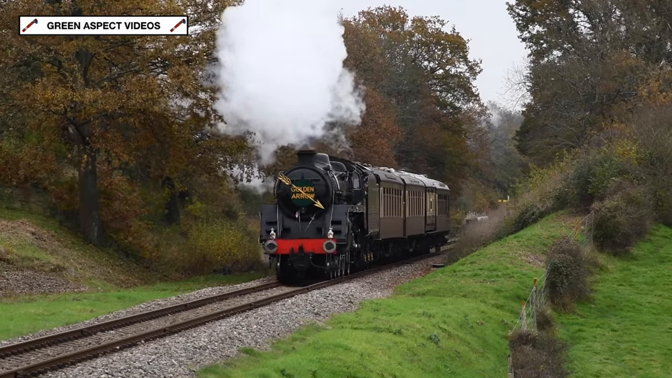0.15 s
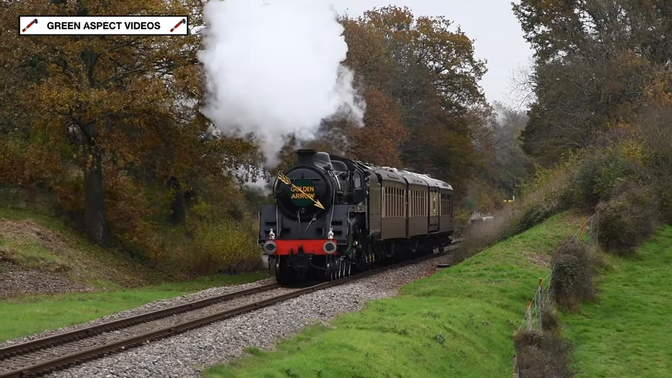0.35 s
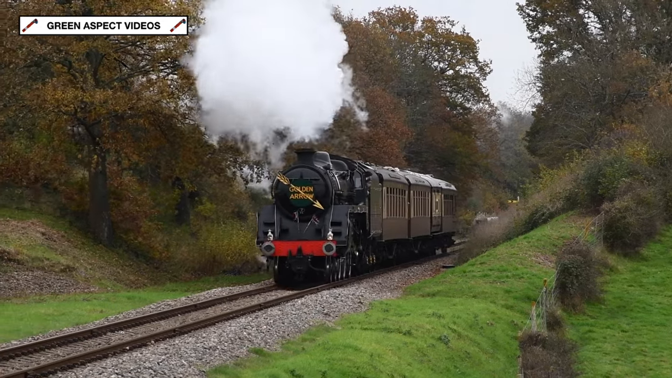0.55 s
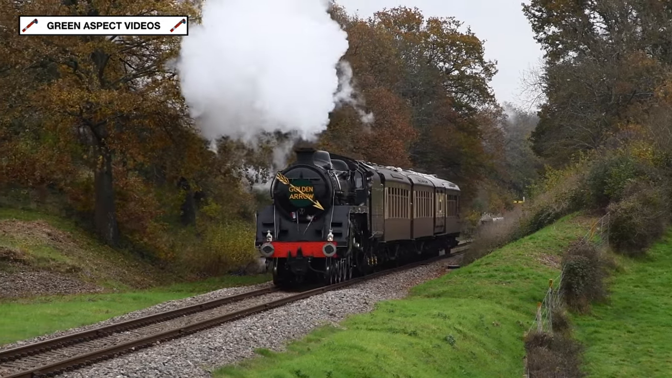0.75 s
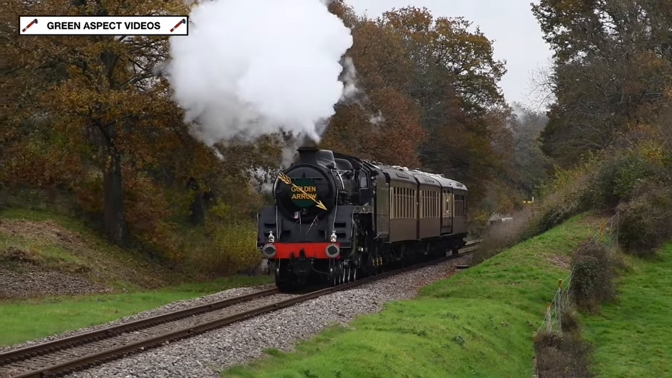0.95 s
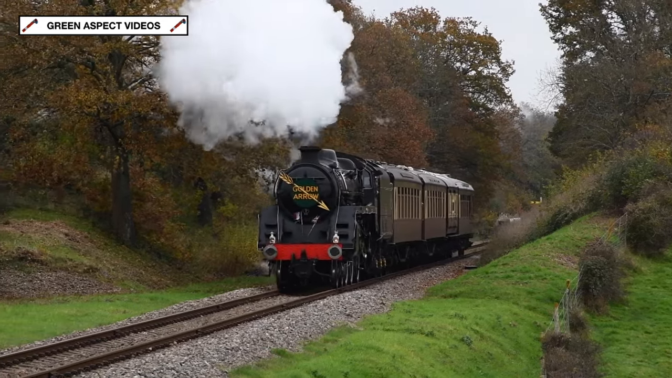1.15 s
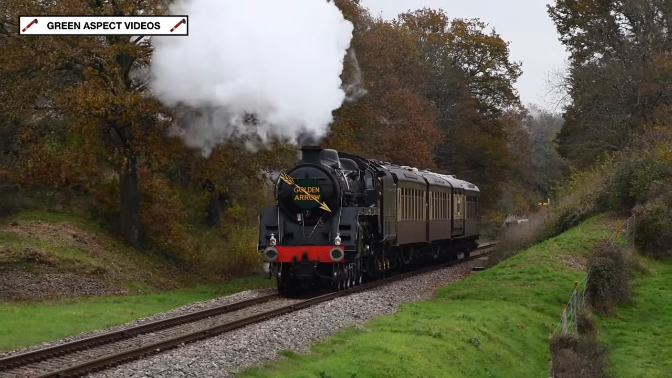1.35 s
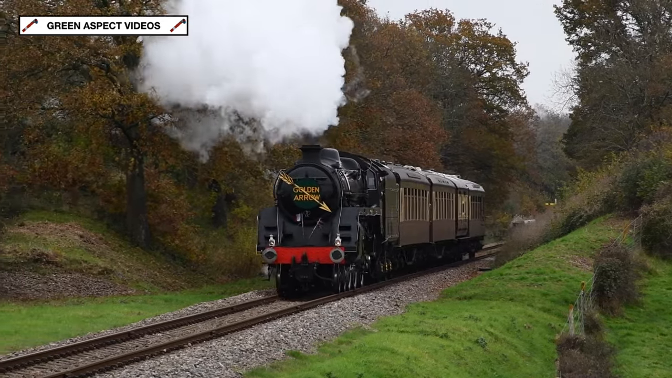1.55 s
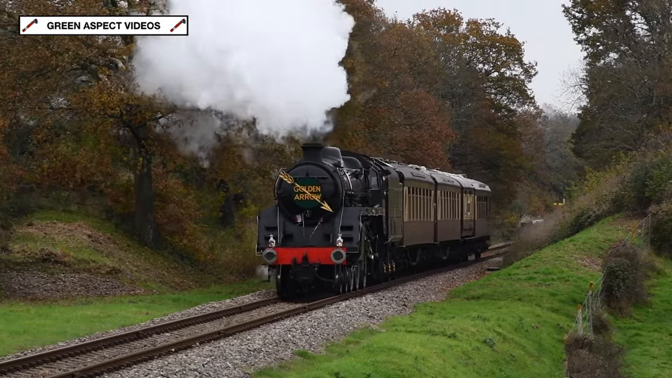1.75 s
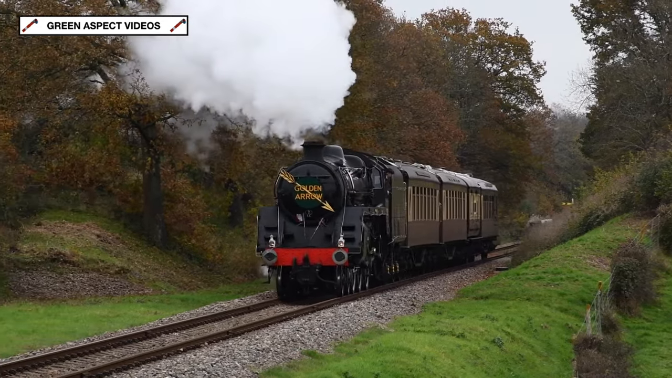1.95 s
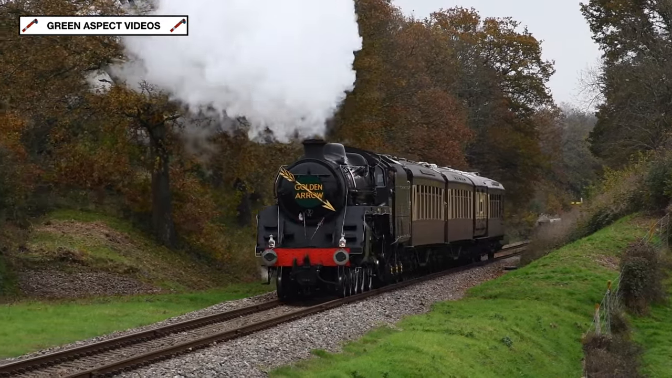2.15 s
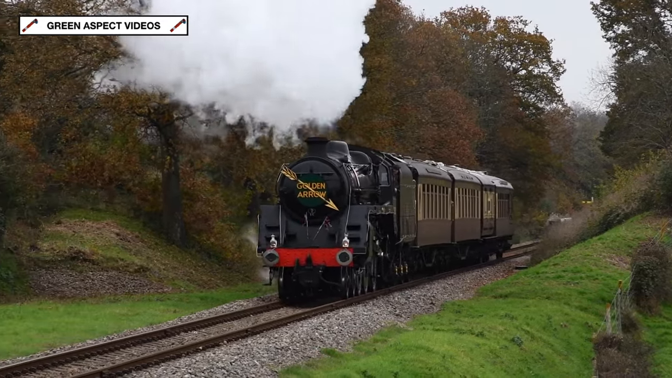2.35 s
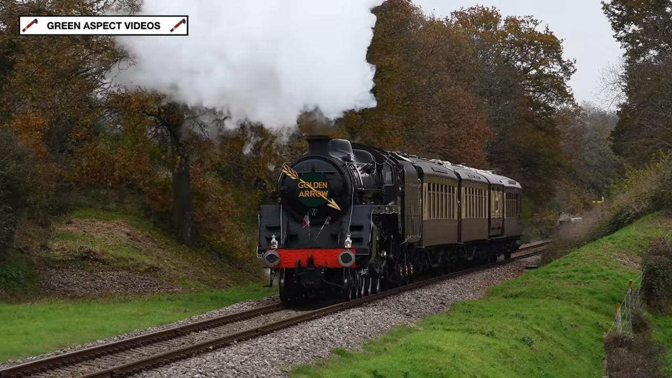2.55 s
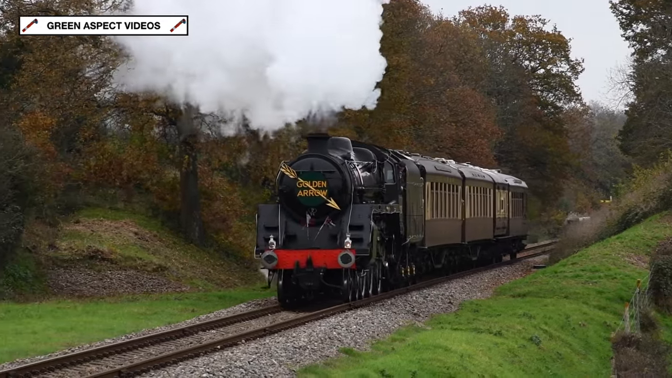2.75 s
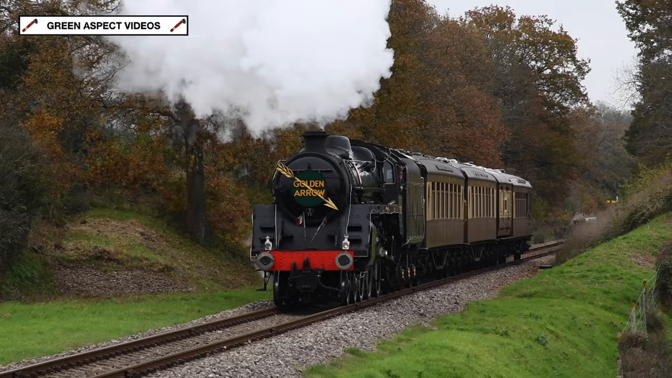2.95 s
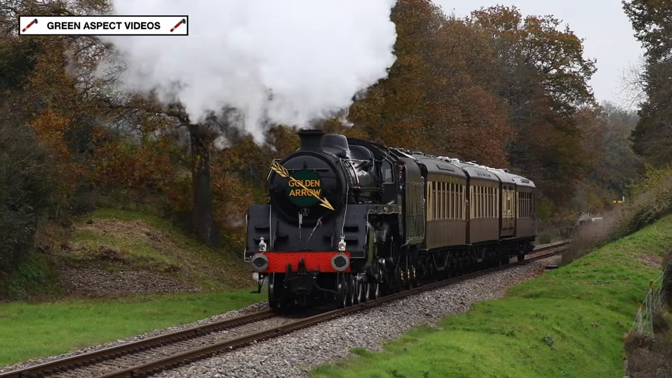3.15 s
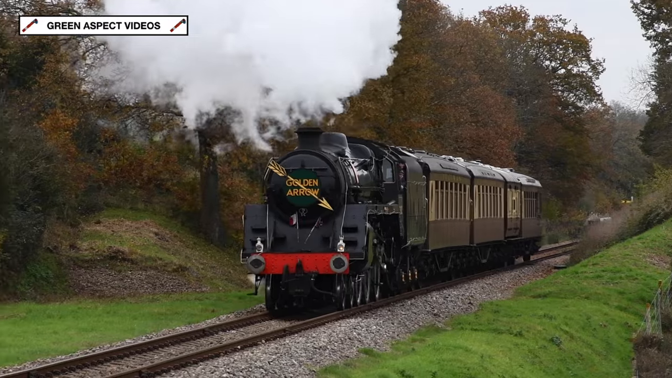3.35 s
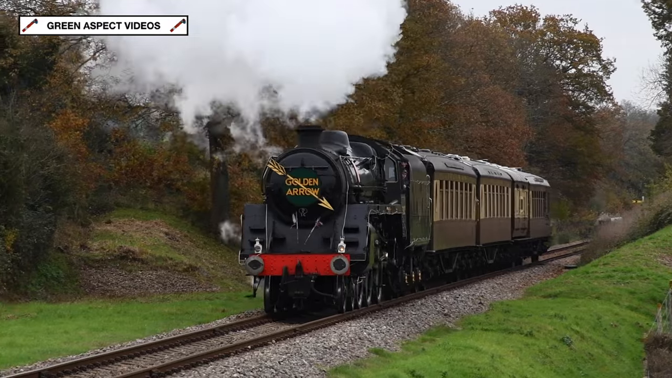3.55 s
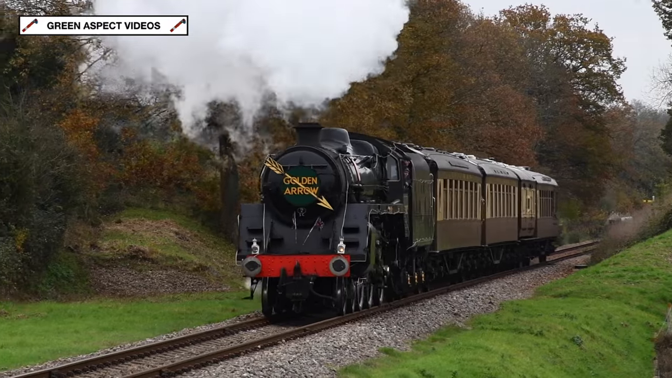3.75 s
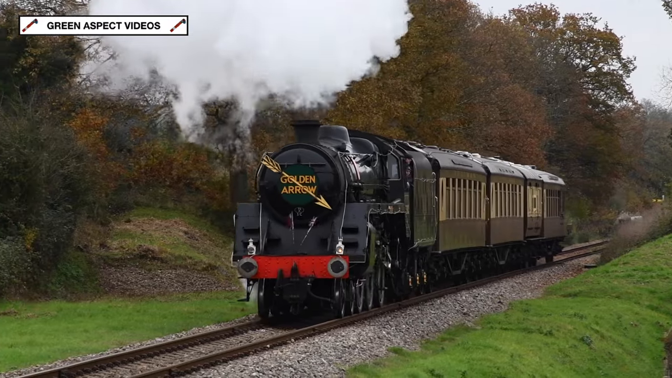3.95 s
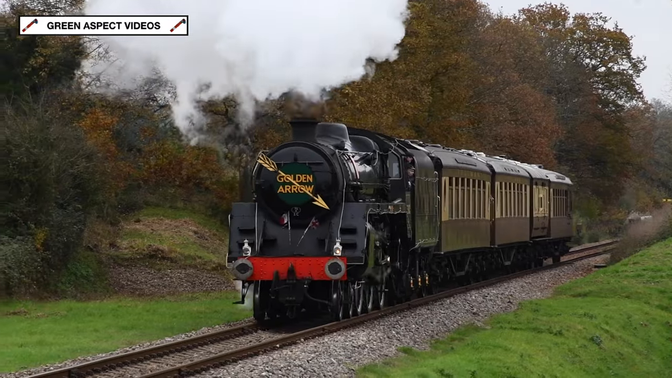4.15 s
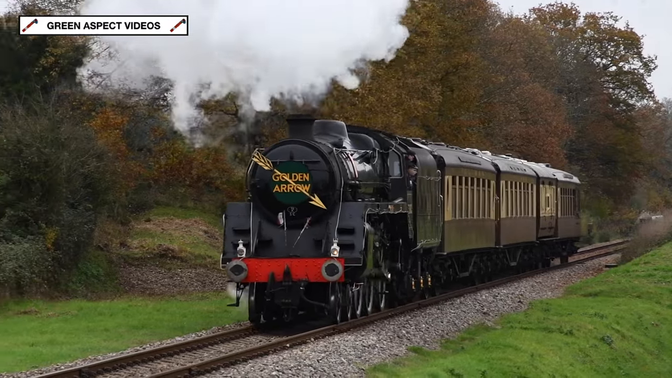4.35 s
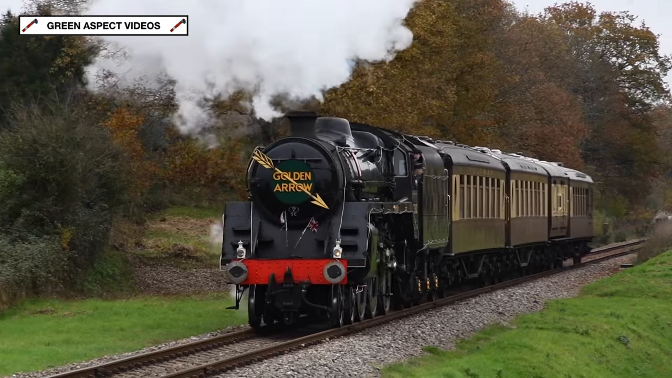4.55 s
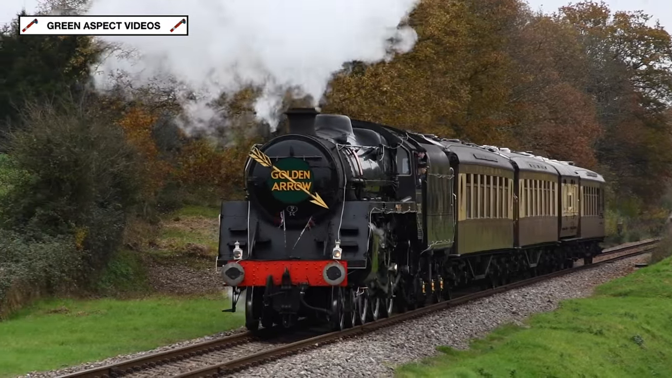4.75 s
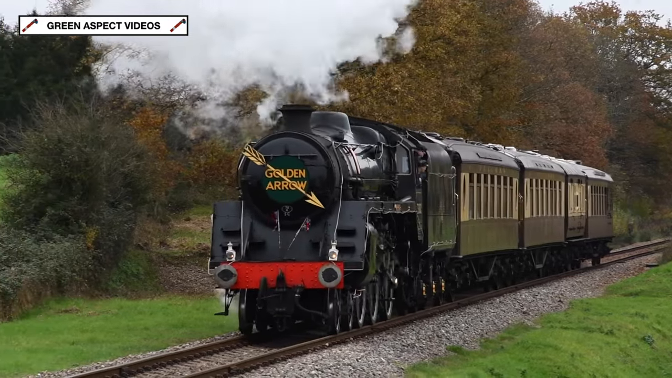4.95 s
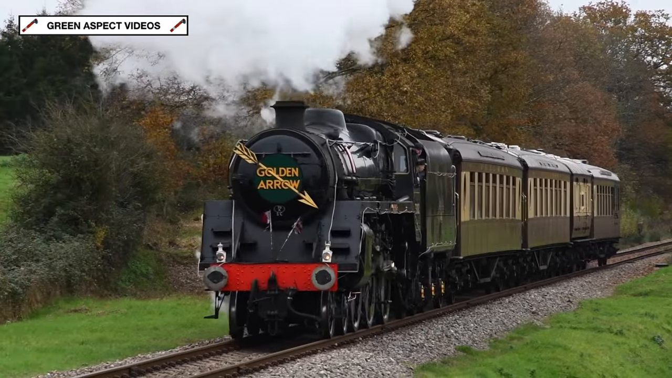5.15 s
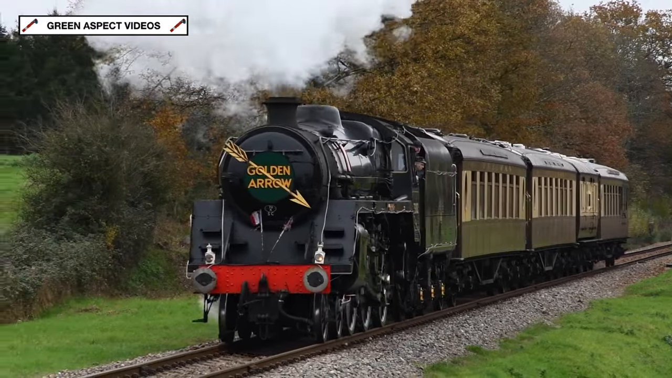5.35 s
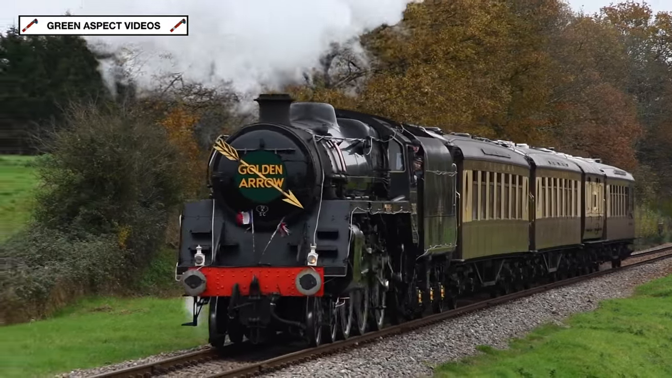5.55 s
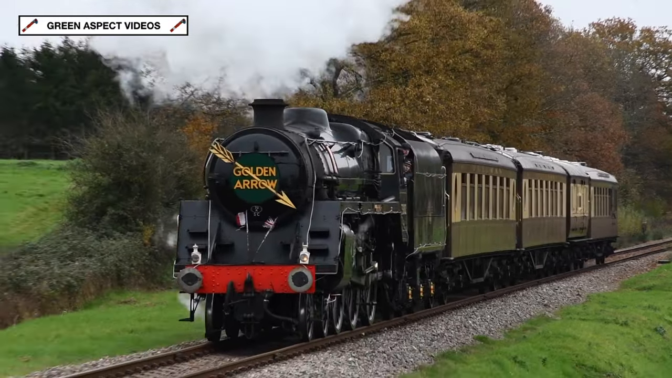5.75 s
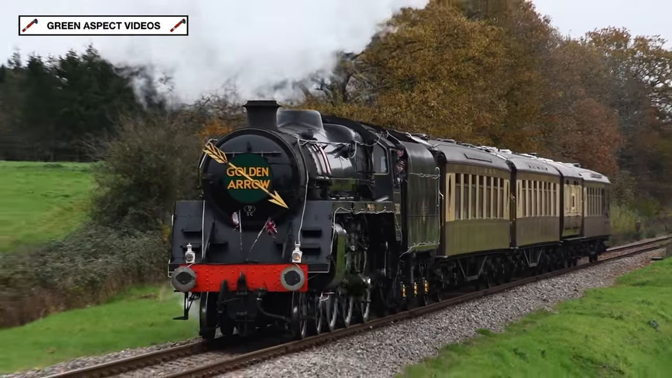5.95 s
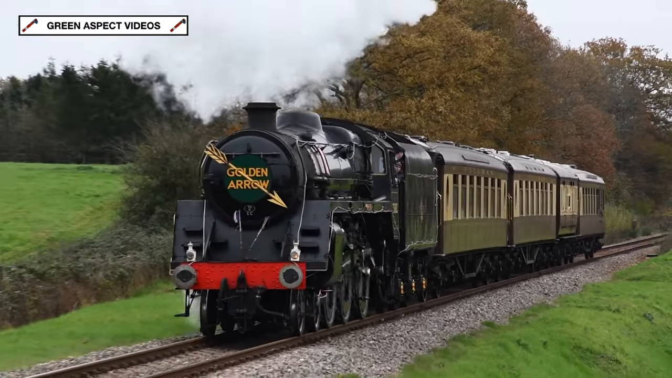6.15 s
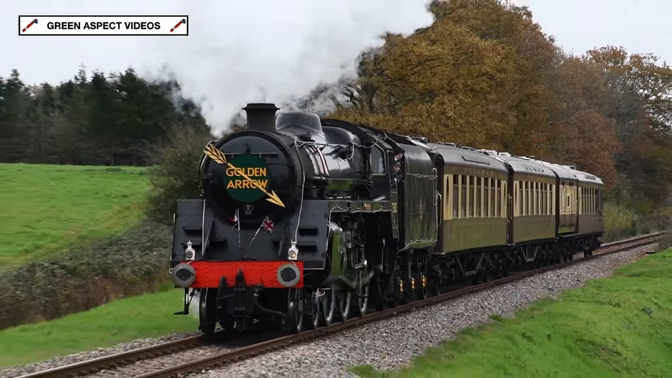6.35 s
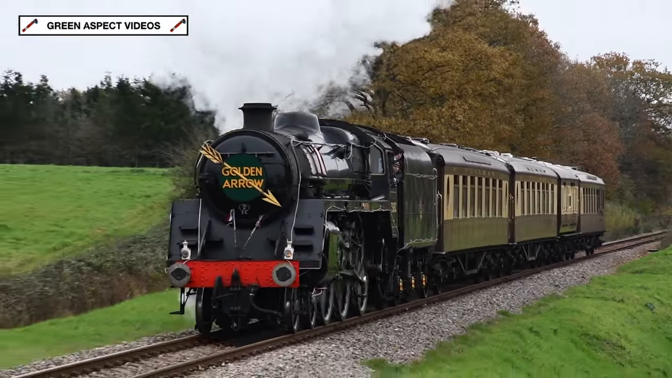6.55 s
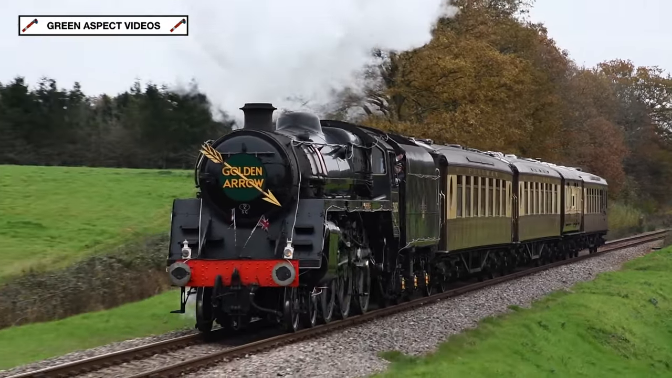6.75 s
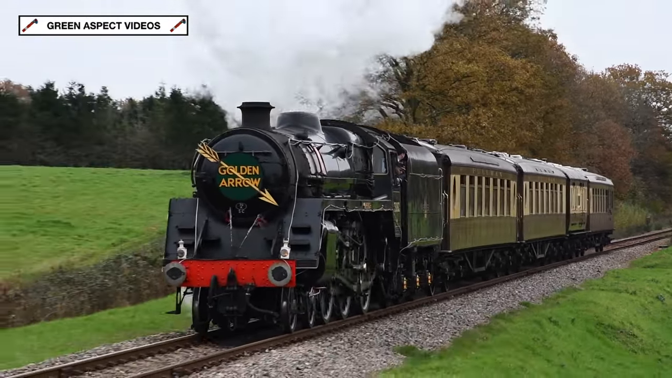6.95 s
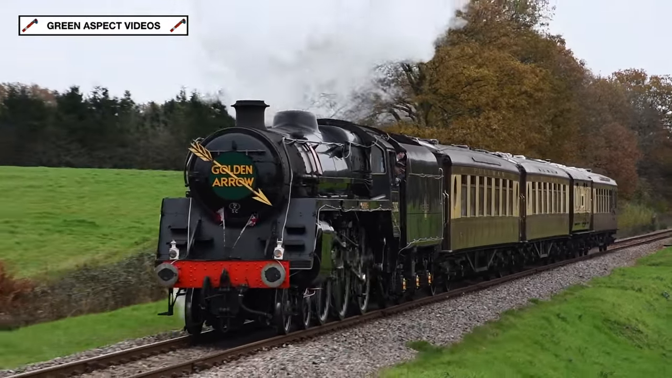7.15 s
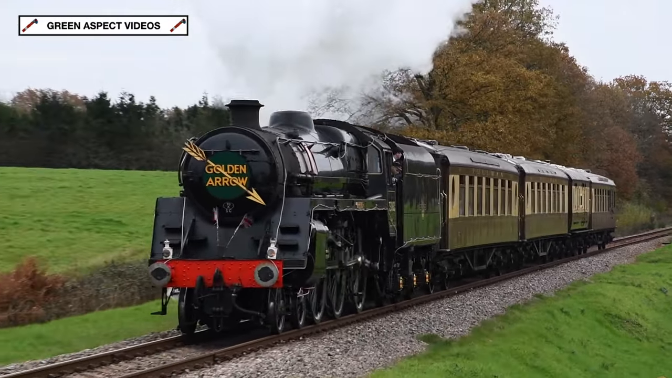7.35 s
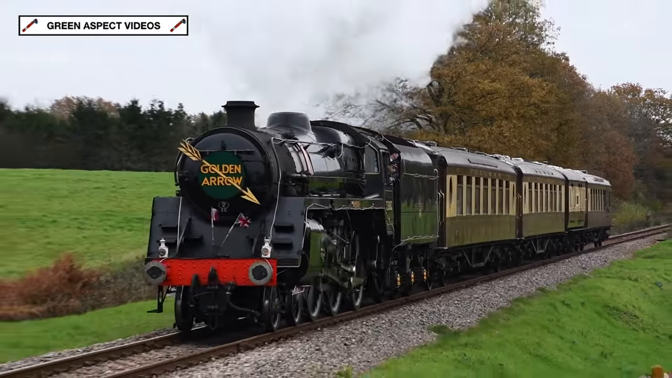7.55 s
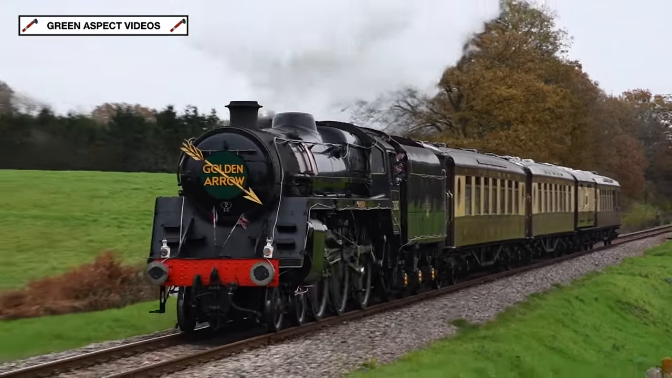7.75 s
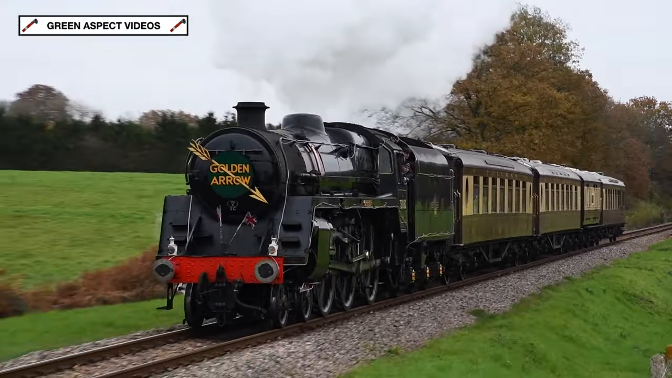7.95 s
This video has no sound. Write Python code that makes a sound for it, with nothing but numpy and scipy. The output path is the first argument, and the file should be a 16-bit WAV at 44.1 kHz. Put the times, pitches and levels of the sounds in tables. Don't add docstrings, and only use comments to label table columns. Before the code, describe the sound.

Quick regular puffs of a steam engine start already clear at a distance and grow steadily louder for about five seconds, then stay strong and close. Each is a short breathy burst with a hollow chimney tone. Beneath them run deep uneven wheel rumble, a mid-range rattling roar partly masked midway, and thin high steam whistling that comes and goes. Open country air, mono microphone, soft echoes from trees.

```python
import sys
import numpy as np
from scipy import signal
from scipy.fft import rfft, irfft
from scipy.io import wavfile
from scipy.ndimage import uniform_filter1d, map_coordinates

SR = 44100
rng = np.random.default_rng(int(sys.argv[2]) if len(sys.argv) > 2 else 0)


def to_wav(s):
    ch = np.atleast_2d(s).T
    pcm = np.round(np.clip(ch, -1, 1) * 32767)
    wavfile.write(sys.argv[1], SR, pcm.astype(np.int16))


def rack_gain(trim_db):
    fader = np.asarray(trim_db, float)
    return 10 ** (fader / 20)


N = 356769
T = np.arange(N) / SR
HZ = np.arange(N // 2 + 1) * SR / N + 1e-3
CENTRES = 32 * 2 ** np.arange(0, 9.1, 1 / 3)
START_M, SPEED_M_S = 99.3, 9.07


def level(x, db):
    return x * rack_gain(db) / np.sqrt(np.mean(x ** 2))


def on_log(hz, table, column=1):
    rows = np.array(table, float)
    return np.interp(np.log(hz), np.log(rows[:, 0]), rows[:, column])


def noise(gain):
    return irfft(rfft(rng.standard_normal(N)) * gain, N)


def walk(rate):
    hold = int(SR / 64 / rate) + 1
    steps = np.repeat(rng.standard_normal(6000), hold)[:N // 64 + 2]
    slow = uniform_filter1d(uniform_filter1d(steps, hold), hold)
    return np.interp(np.arange(N) / 64, np.arange(len(slow)), slow / slow.std())


def bands(table):
    whole = rfft(rng.standard_normal(N)) * rack_gain(on_log(HZ, table))
    for hz in CENTRES:
        away = np.clip(3 * np.log2(HZ / hz), -1, 1)
        yield hz, irfft(whole * np.cos(away * np.pi / 2) ** 2, N)


def resonance(hz, width):
    return 1 / (1 + (2 * (HZ - hz) / width) ** 2)


def distance(t):
    return START_M - SPEED_M_S * t


def nearer_db(t):
    return 20 * np.log10(START_M / distance(t))


# (t/s, level/dB)
HIDING = [(0.0, 2.5), (0.6, -0.5), (1.7, -4), (3.0, -5.5), (4.4, -9), (5.2, -6.5), (6.2, -1), (7.2, 0),
          (8.09, 0)]


def cover_db(t):
    return np.interp(t, *np.transpose(HIDING))


def grass(x):
    heights_m2, share = 5.84, 0.29
    soft = signal.sosfilt(signal.butter(1, [350, 9000], "band", fs=SR, output="sos"), x)
    lag_s = 2 * heights_m2 / distance(T) / 343
    return x - share * map_coordinates(soft, [np.arange(N) - lag_s * SR], order=3)


def still_air():
    return level(noise(1 / np.sqrt(1 + (HZ / 20000) ** 2)), -59.5)


# (f/Hz, level/dB per Hz)
WHEEL_COLOUR = [(18, -34), (40, -12), (70, 0), (110, -3), (200, -9), (320, -17), (600, -35), (1200, -80)]


def wheel_rumble():
    rumble_db = -39.5 + 1.08 * nearer_db(T)
    return level(noise(rack_gain(on_log(HZ, WHEEL_COLOUR))), -0.33) * rack_gain(rumble_db + 2.3 * walk(8.2))


# (f/Hz, level/dB per Hz)
MOTION_COLOUR = [(150, -37), (250, 0), (467, -1), (927, -3.5), (1380, -3.5), (2680, -10.5), (3520, -11),
                 (4200, -26), (5460, -61), (9240, -120)]


def rods_and_coaches(shake):
    motion_db = -32 + 1.35 * nearer_db(T) + 4.3 * cover_db(T)
    roar = 0
    for _, band in bands(MOTION_COLOUR):
        roar = roar + band * rack_gain(1.8 * shake + 1.5 * walk(14))
    return grass(level(roar, -13.0) * rack_gain(motion_db))


# (f/Hz, width/Hz, level/dB)
LEAK_PITCHES = [(3545, 170, 0), (3330, 340, -2), (3960, 220, -10), (775, 90, -5)]
# (t/s, level/dB)
LEAK_OPENING = [
    (0.0, -55),
    (0.5, -44.5),
    (1.7, -38),
    (2.5, -38),
    (3.0, -40.5),
    (4.3, -44),
    (5.5, -38),
    (7.1, -37.5),
    (8.09, -46.5),
]


def singing_leaks():
    leaks = 0
    for hz, width, db in LEAK_PITCHES:
        leaks = leaks + level(noise(resonance(hz, width)), db) * rack_gain(1.6 * walk(26) + 2.0 * walk(6.5))
    return leaks * rack_gain(np.interp(T, *np.transpose(LEAK_OPENING)) - 9.5)


# (f/Hz, level/dB per Hz)
HISS_COLOUR = [(2500, -30), (3800, -2), (4900, 0), (5400, -6), (6000, -5), (7000, -12), (11000, -28),
               (16000, -44)]


def valve_hiss(shake):
    hiss_db = -55.5 + 1.19 * nearer_db(T) + 0.56 * cover_db(T)
    return level(noise(rack_gain(on_log(HZ, HISS_COLOUR))), 0.86) * rack_gain(hiss_db + 0.63 * shake + 1.3 * walk(25))


def train():
    shake = walk(7.4)
    return wheel_rumble() + rods_and_coaches(shake) + singing_leaks() + valve_hiss(shake)


# (t/s, roar level/dB of beat 1, beat 2, beat 3, beat 4)
WHEEL_TURNS = [(0.073, -21.5, -21, -22, -21.5), (0.598, -22, -20, -21, -21), (1.122, -21.5, -21, -20, -21),
               (1.651, -21, -19, -21, -20.5), (2.179, -20.5, -18.5, -18.5, -18.5),
               (2.707, -18, -17.5, -18.5, -17.5), (3.237, -17, -18, -18, -17.5),
               (3.766, -16, -16.5, -17, -16.5), (4.296, -16.5, -16, -17, -16.5),
               (4.826, -15.5, -15, -16, -16.5), (5.355, -15.5, -15, -16, -17),
               (5.885, -16, -15.5, -16, -16), (6.415, -16.5, -15.5, -16.5, -14.5),
               (6.945, -16, -15.5, -15.5, -15.5), (7.476, -16.5, -15.5, -15.5, -16.5),
               (8.008, -17, -14, -23, -17)]
# (lag t/s, bass level/dB, hiss level/dB, thump against roar level/dB, length/ms)
PISTON_STROKES = [
    (0, -0.7, -4.1, 1, 28),
    (0.137, 0, -3, -12, 29),
    (0.262, -0.2, -5, -13, 25.6),
    (0.393, -1.5, -5, -6.5, 22),
]


def beats():
    strokes = np.transpose(PISTON_STROKES)
    lag, bass_db, hiss_db, thump_db, ms = (np.tile(column, len(WHEEL_TURNS)) for column in strokes)
    turns = np.array(WHEEL_TURNS)
    s = np.repeat(turns[:, 0], len(PISTON_STROKES)) + lag
    near = nearer_db(s)
    bass_db = bass_db + 0.8867 * near
    hiss_db = hiss_db + 0.51 * near + 0.7 * cover_db(s)
    rows = np.array([s, turns[:, 1:].ravel(), bass_db, hiss_db, thump_db, ms + 0.75 * near])
    return rows[:, s < N / SR]


# (f/Hz, level/dB per Hz)
JET_COLOUR = [(18, -52), (30, -113), (62, -17), (178, 3), (271, 0.5), (412, 0), (835, -3.5), (928, -3),
              (1930, -8.5), (2440, -12.5), (4020, -21), (5510, -34), (7350, -37.5), (15700, -65)]
# (f/Hz, lag/ms, time to the top/ms, sharpness)
JET_SWELL = [(60, -7, 20, 0.57), (193, -3, 38.3, 1.16), (590, -1, 33.8, 1.2), (1950, -1, 25.1, 0.74),
             (4870, 5, 16.7, 0.24), (12000, -2, 17.7, 0.24)]


def exhaust():
    stagger_ms, patch_spread_db = 1.5, 0.8
    s, roar_db, bass_db, hiss_db, _, ms = beats()
    bass_db, hiss_db = bass_db - bass_db.mean(), hiss_db - hiss_db.mean()
    coarse = T[::32]
    age = (coarse - s[:, None]) * 1000 * 33 / ms[:, None]
    draws = rng.standard_normal((2, len(s), len(CENTRES)))
    patch, late = uniform_filter1d(draws, size=3, axis=2) * np.sqrt(3)
    air_db = 0.1112 * (distance(s) - distance(s).mean())
    out = 0
    for k, (hz, band) in enumerate(bands(JET_COLOUR)):
        lag, top, sharp = (on_log(hz, JET_SWELL, column=c) for c in (1, 2, 3))
        u = np.clip(age - lag - stagger_ms * late[:, k:k + 1], 0, 400) / top
        push = (u * np.exp((1 - u ** 2) / 2)) ** sharp
        bass_share = np.interp(np.log2(hz), np.log2([300, 1200, 6000]), [1, 0, 0])
        hiss_share = np.interp(np.log2(hz), np.log2([2000, 6000, 14000]), [0, 1, 1.3])
        db = roar_db + bass_share * bass_db + hiss_share * hiss_db
        db = db + patch_spread_db * patch[:, k] - air_db * (hz / 10000) ** 2
        swell = uniform_filter1d(rack_gain(db) @ push, size=7)
        out = out + band * np.interp(T, coarse, swell) * rack_gain(-0.5 * walk(40))
    return level(out, -20.0)


# (f/Hz, width/Hz, level/dB)
CHIMNEY_PITCHES = [(219, 26, 0.5), (403, 26, 2), (922, 35, 3), (1367, 30, 3.5), (2452, 220, 5),
                   (4260, 780, 3)]


def chimney(x):
    db = sum(peak_db * resonance(hz, width) for hz, width, peak_db in CHIMNEY_PITCHES)
    return irfft(rfft(x) * rack_gain(db), N)


def thumps():
    lag_ms, width_ms, length = 11, 3.2, 2048
    out = np.zeros(N + length)
    u = (np.arange(length) / SR * 1000 - lag_ms) / width_ms
    pulse = -u * np.exp(-u ** 2 / 2)
    for s, roar_db, _, _, thump_db, _ in beats().T:
        start = int(s * SR)
        out[start:start + length] += rack_gain(roar_db + thump_db - 2) * pulse
    return out[:N]


# (level/dB, time to fall 60 dB t/s, build-up t/s, top f/Hz)
BANK_ECHOES = [
    (-16, 0.18, 0.013, 3900),
    (-19.5, 0.69, 0.2, 2800),
]


def banks(x):
    hop = 8192
    t, out = T[:SR], np.zeros(N + SR + 3 * hop)
    padded = np.pad(x, (hop, 2 * hop))
    fade = np.sin(np.pi * np.arange(2 * hop) / (2 * hop))
    for start in range(0, N + hop, hop):
        tails = 0
        for db, t60, build, top_hz in BANK_ECHOES:
            tail = rng.standard_normal(SR) * rack_gain(-60 * t / t60) * (1 - np.exp(-(t / build) ** 2))
            tail = signal.sosfilt(signal.butter(1, top_hz, fs=SR, output="sos"), tail)
            tails = tails + rack_gain(db) * tail / np.sqrt(np.sum(tail ** 2))
        echo = signal.fftconvolve(padded[start:start + 2 * hop] * fade, tails)
        out[start:start + len(echo)] += echo
    return out[hop:hop + N]


def scene():
    running = train() + still_air()
    puffs = grass(chimney(exhaust()) + thumps())
    return (running + puffs + banks(puffs))[None]


def low_pass(x):
    return signal.sosfilt(signal.butter(12, 15850, fs=SR, output="sos"), x)


def record(dry):
    x = signal.sosfilt(signal.butter(3, 54, "high", fs=SR, output="sos"), dry)
    x = np.tanh(0.75 * x) / 0.75
    x = signal.sosfilt(signal.ellip(12, 0.2, 70, 15750, fs=SR, output="sos"), x)
    return low_pass(x)


dry = scene()
out = record(dry)
to_wav(out)
```